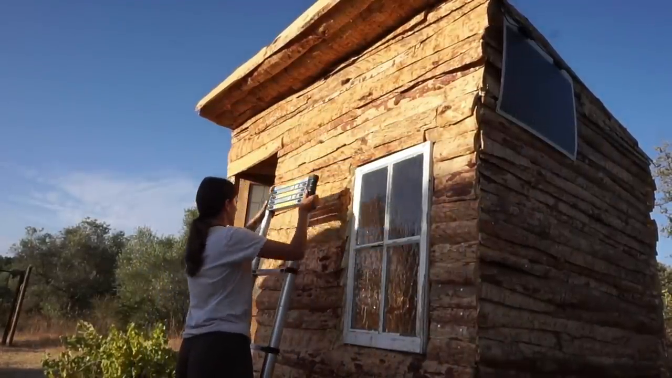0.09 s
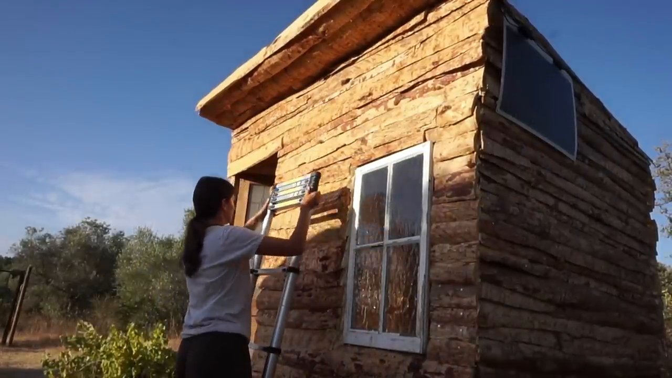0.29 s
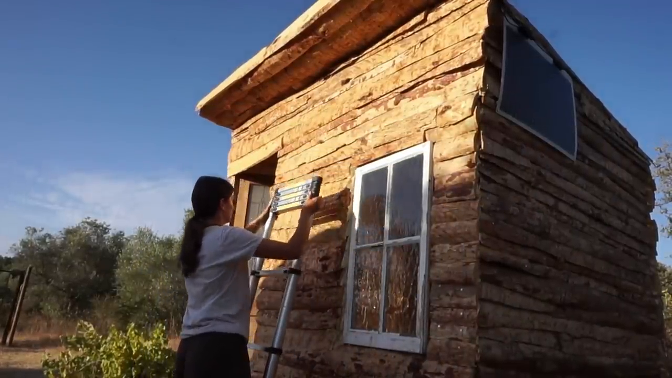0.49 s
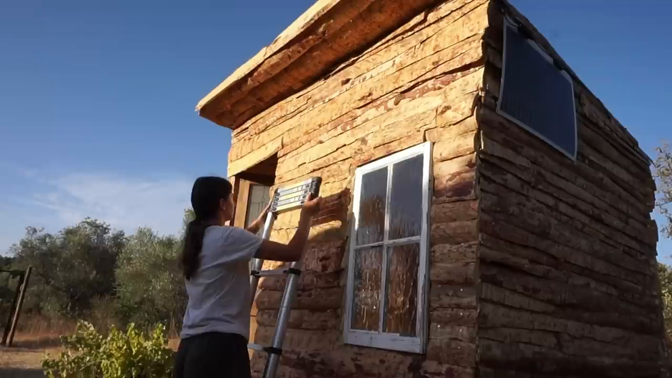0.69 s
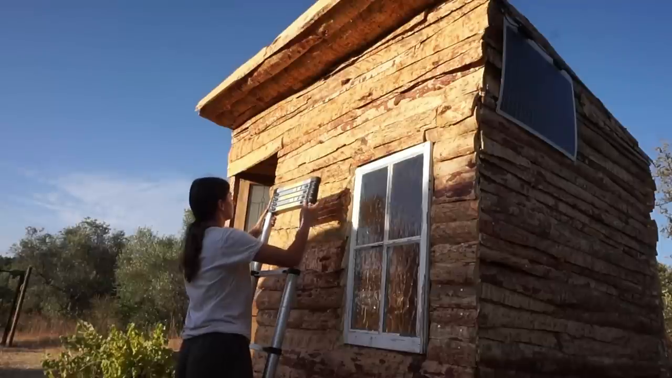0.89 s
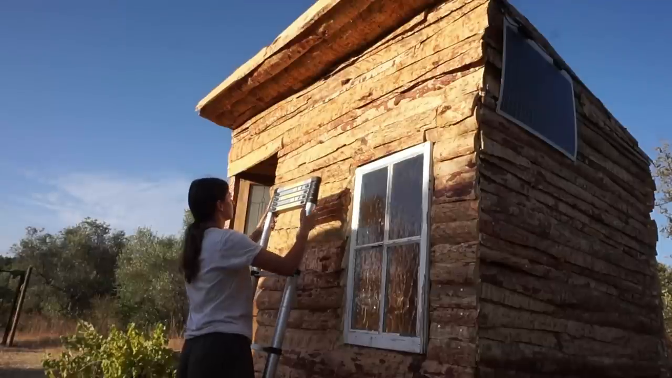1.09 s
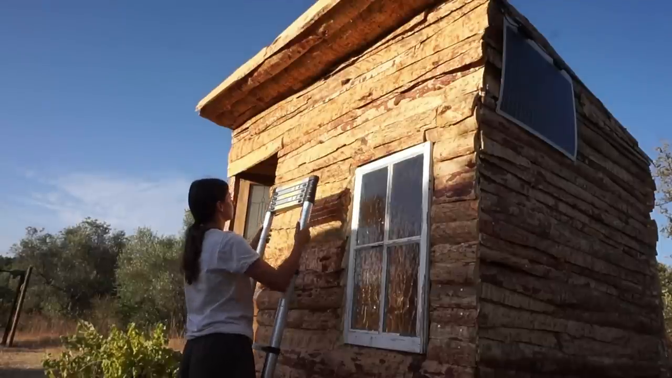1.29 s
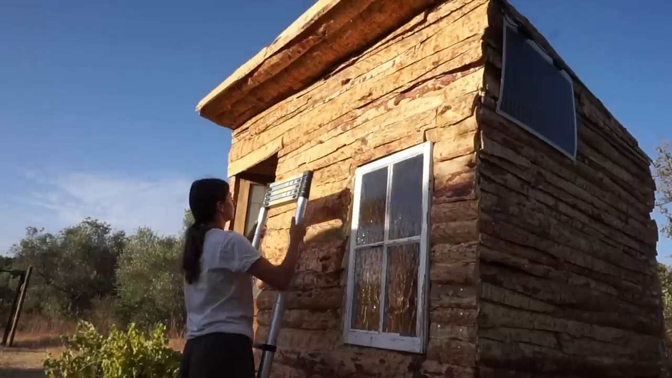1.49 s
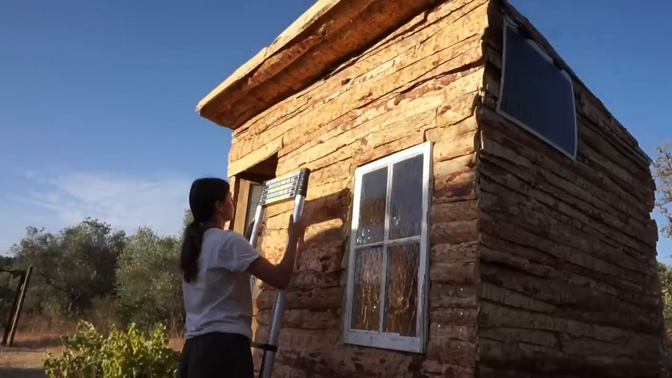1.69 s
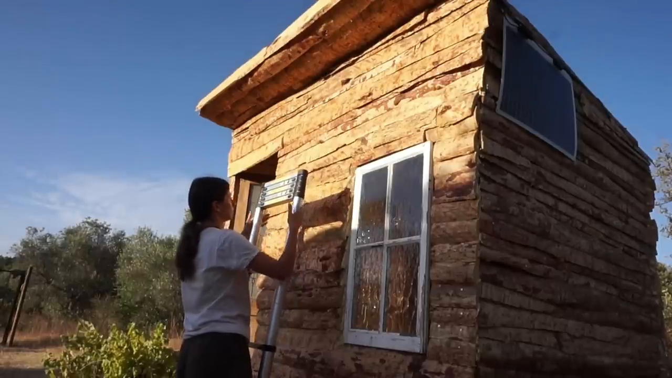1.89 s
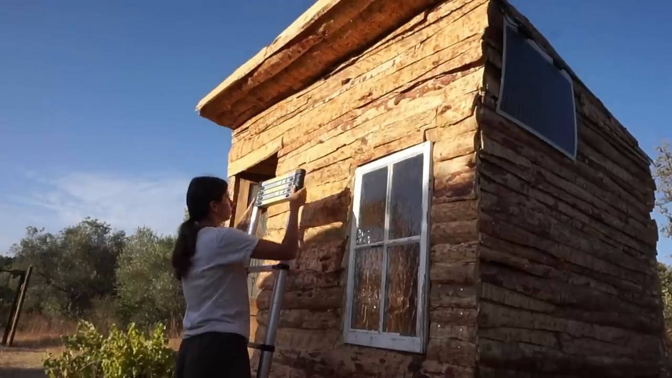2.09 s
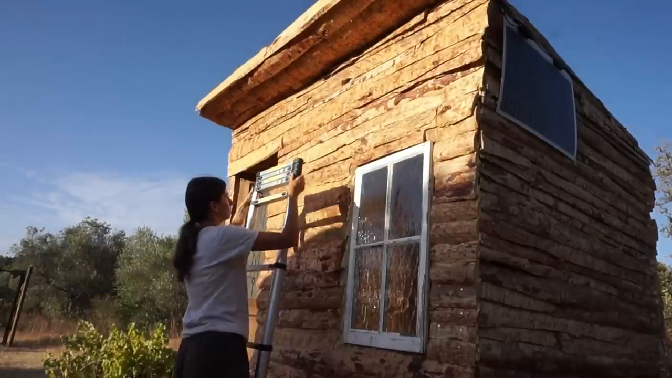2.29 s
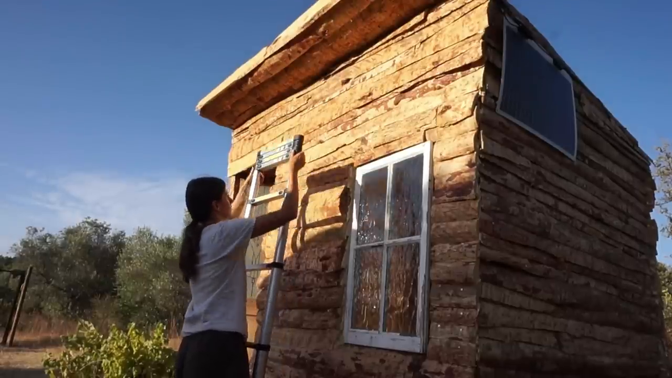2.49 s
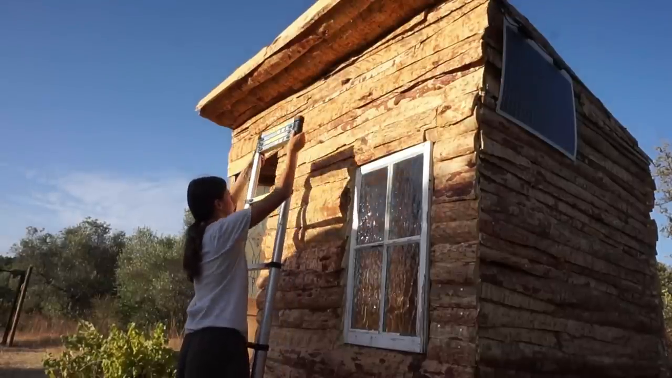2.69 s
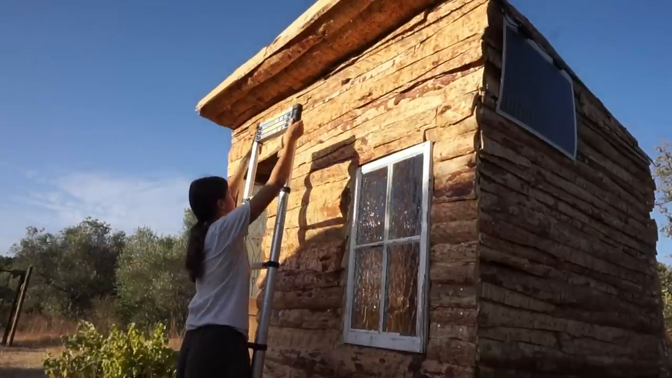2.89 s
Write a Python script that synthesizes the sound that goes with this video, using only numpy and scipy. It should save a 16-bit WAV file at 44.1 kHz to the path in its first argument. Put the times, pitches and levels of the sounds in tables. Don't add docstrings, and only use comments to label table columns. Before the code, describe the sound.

Aluminium telescopic ladder clacks and rattles against a timber wall outdoors, with light wind puffs

```python
import sys
import numpy as np
from scipy import signal
from scipy.fft import rfft, irfft, next_fast_len
from scipy.io import wavfile
from scipy.ndimage import uniform_filter1d, map_coordinates

SR = 44100
rng = np.random.default_rng(int(sys.argv[2]) if len(sys.argv) > 2 else 0)


def invert_db(level):
    return 10 ** (np.asarray(level, dtype=float) / 20)


def persist_wave(psi):
    counts = np.round(np.clip(psi, -1, 1) * 32767).astype(np.int16)
    wavfile.write(sys.argv[1], SR, np.atleast_2d(counts).T)


N = 127890
HIT = 8192


def unit(x):
    return x / np.sqrt(np.mean(x ** 2) + 1e-20)


def along(points, hz):
    f, v = np.transpose(points)
    return np.interp(np.log(hz + 1), np.log(f + 1), v)


def curve(rows):
    s, v = np.transpose(rows)
    return np.interp(np.arange(N) / SR, s, v)


def wobble(rate, size=N):
    knots = rng.standard_normal(int(size * rate / SR) + 4)
    return map_coordinates(knots, [np.arange(size) * rate / SR])


def filtered(x, response):
    m = next_fast_len(len(x) + 8192)
    return irfft(rfft(x, m) * response(np.fft.rfftfreq(m, 1 / SR)), m)[:len(x)]


def causal(db):
    c = irfft(np.log(invert_db(db) + 1e-6))
    c[1:len(c) // 2] *= 2
    c[len(c) // 2 + 1:] = 0
    return np.exp(rfft(c))


def resonate(f, peaks):
    total = 0
    for k, (centre, width, db) in enumerate(peaks):
        mode = 1j * f * width / (centre * centre - f * f + 1j * f * width)
        total = total + (-1) ** k * invert_db(db) * mode
    return total


def add(out, x, s):
    out[round(s * SR):][:len(x)] += x


def contact(length_s, rise_s, t60_s, grain_db, response):
    t = np.arange(HIT) / SR
    shape = (1 - np.exp(-t / rise_s)) * invert_db(-60 * np.maximum(t - length_s, 0) / t60_s)
    grain = invert_db(grain_db * wobble(903.3, size=HIT)) * rng.standard_normal(HIT)
    x = filtered(shape * grain, response)
    return x / np.sqrt(uniform_filter1d(x ** 2, size=132).max())


# t/s, peak level/dB
WIND_PUFFS = [(0.679, -45.5), (0.729, -40.5), (0.767, -49), (0.858, -46), (1.259, -44), (1.298, -53.5),
              (1.352, -36), (1.401, -47), (1.56, -37), (1.605, -42), (1.634, -40), (1.729, -35.5),
              (2.022, -37), (2.05, -36), (2.308, -47), (2.349, -43.5), (2.446, -36), (2.494, -35),
              (2.519, -38.5), (2.558, -41.5), (2.745, -37), (2.794, -49), (2.821, -40), (2.849, -31.5),
              (2.89, -39.5)]
# t/s, level/dB
GUST_LEVEL = [(.25, -76.5), (.32, -68), (.75, -54.5), (1.2, -64.5), (1.33, -44), (1.47, -60.5),
              (1.6, -49.5), (1.85, -60.5), (2.06, -51), (2.2, -65.5), (2.45, -48), (2.65, -66), (2.82, -40)]
# f/Hz, density/dB per Hz
BUFFET_SPECTRUM = [(20, -17.5), (45, 0.5), (90, -5.5), (150, -11.5), (250, -23.5), (500, -68.5)]
# f/Hz, density/dB per Hz
AIR_SPECTRUM = [(71, -28), (120, -0.5), (377, -5.5), (462, -5), (3490, -23.5), (14300, -27), (15800, -31)]


def wind():
    out = np.zeros(N + HIT)
    lead_s = .06
    t = np.arange(HIT) / SR - lead_s
    for s, db in WIND_PUFFS:
        hz = 89.1 * np.exp(rng.normal(0, 0.0946))
        swell = np.exp(-(t * hz / 0.49) ** 2)
        push = np.sin(2 * np.pi * hz * t + rng.normal(np.pi, 0.88))
        add(out, invert_db(db) * swell * push, s - lead_s)
    rumble = filtered(rng.standard_normal(N), lambda f: invert_db(along(BUFFET_SPECTRUM, f)))
    lumps = invert_db(4.27 * wobble(29.783)) * rumble
    spectrum = [(40, -52.5)] + list(AIR_SPECTRUM)
    air = filtered(rng.standard_normal(N), lambda f: invert_db(along(spectrum, f)))
    fade = np.minimum(np.arange(N)[::-1] / 200, 1)
    gusts = fade * (out[:N] + invert_db(curve(GUST_LEVEL)) * unit(lumps))
    return gusts + invert_db(-62 + 1.3 * wobble(3.91)) * unit(air)


# t/s, level/dB
RUB_LEVEL = [(0, -60.5), (.35, -60), (.55, -60), (.75, -73), (1.45, -92), (1.7, -65), (2.14, -64.5),
             (2.25, -74), (2.5, -56.5), (2.72, -57.5), (2.9, -70.5)]
# f/Hz, density/dB per Hz
RUB_SPECTRUM = [(120, -21), (250, -7.5), (500, -15.5), (1700, -17.5), (4500, -23.5), (15500, -34)]
# f/Hz, then a list of t/s, level/dB
SQUEAKS = [
    (1310, [(.1, -69), (.14, -90)]),
    (2380, [(.11, -70), (.15, -90)]),
    (1520, [(2.3, -90), (2.4, -73), (2.6, -72), (2.67, -64), (2.76, -80)]),
    (1600, [(2.72, -90), (2.79, -67)]),
]


def rubbing():
    level_db = curve(RUB_LEVEL)
    loudest_db = level_db.max()
    grain = unit(invert_db(wobble(120) + 1.1 * wobble(21.76)) * rng.standard_normal(N))
    broad = unit(filtered(grain, lambda f: invert_db(along(RUB_SPECTRUM, f))))
    notes = np.zeros(N)
    for hz, fits in SQUEAKS:
        tone = filtered(rng.standard_normal(N), lambda f: resonate(f, [(hz, 136, 0)]) ** 2)
        notes += invert_db(curve(fits) + 5.4 * wobble(44.71)) * unit(tone)
    return invert_db(-0.5 + loudest_db + 0.765 * (level_db - loudest_db)) * broad + notes


# t/s, level/dB, chatter length/s
SETTLE_KNOCKS = [
    (.006, -53, 0.0066),
    (0.178, -35.5, 0.0386),
    (.201, -21, 0.0064),
    (0.212, -25, 0.006),
    (0.226, -36.5, 0.0082),
    (0.238, -29, 0.0045),
    (0.252, -35, 0.00215),
]
SHIFT_KNOCKS = [(0.352, -51, 0.0128), (.370, -47.5, 0.0047), (0.379, -44, 0.00415), (0.401, -39, 0.0134),
                (0.409, -36.5, 0.0041), (0.429, -39.5, 0.0143), (.442, -42, 0.0178), (.457, -38, 0.0076),
                (.468, -50, 0.0057), (0.492, -49, 0.0036), (0.618, -42, 0.00276)]
REGRIP_KNOCKS = [(1.508, -61, 0.0045), (1.533, -43, 0.00906), (1.559, -45.5, 0.0077),
                 (1.568, -41.5, 0.0089), (1.587, -36, 0.00186), (1.595, -36, 0.0044), (1.605, -45, 0.0065),
                 (1.619, -53.5, 0.0023), (1.814, -42, 0.0167), (1.828, -35, 0.0164), (1.844, -32, 0.00126),
                 (1.854, -38, 0.0061), (1.861, -31, 0.0052), (1.872, -33, 0.0081), (1.888, -43, 0.0054)]
LOCK_KNOCKS = [(2.242, -51.5, 0.0051), (2.290, -52.5, 0.0028), (2.425, -40, 0.0058), (2.433, -45.5, 0.0031),
               (2.549, -45, 0.0075), (2.558, -33, 0.0055), (2.565, -32, 0.00743), (2.578, -41, 0.0124),
               (2.588, -36, 0.0257), (2.601, -22.5, 0.00481), (2.609, -36.5, 0.00404), (2.622, -50, 0.0062),
               (2.638, -52.5, 0.022), (2.655, -45.5, 0.0158)]
# f/Hz, level/dB
TUBE_MODES = [
    [(700, 1), (1757.6, 6.5), (2453, 1), (3240, 4.5), (1130, -5.5), (4280, -5)],
    [(350, -6.5), (845, 5), (1400, 1), (1890, 2.5), (2750, -4)],
    [(509, -3.5), (1017, 3), (1750, -1.5), (2550, 2.5), (3280, -5.5)],
    [(680, -0.5), (1280, 3), (1848, -1.5), (2497, 2.5), (3300, -5.5)],
]
GRIP_TILT = [-0.13, -0.018, -1.86, -1.474]
# f/Hz, density/dB per Hz
COLLAR_SPECTRUM = [(88, -49.5), (150, -11.5), (695, -9.5), (1900, -5.5), (5000, -6.5), (10000, -16.5),
                   (15800, -24.5)]


def tubes():
    out = np.zeros(N + HIT)
    grips = (SETTLE_KNOCKS, SHIFT_KNOCKS, REGRIP_KNOCKS, LOCK_KNOCKS)
    ring_db, mode_width_hz, t60_s = 3.5, 200, 0.0511
    soft_dark = 0.0812
    for knocks, modes, tilt in zip(grips, TUBE_MODES, GRIP_TILT):
        for s, db, length_s in knocks:
            peaks = [(hz * np.exp(rng.normal(0, .02)), mode_width_hz, g + ring_db + rng.normal(0, 2))
                     for hz, g in modes]

            def body(f):
                octaves = np.log2(np.clip(f, 200, 12000) / 1500)
                tilted = causal((tilt + soft_dark * (db + 22.5)) * octaves)
                metal = causal(along(COLLAR_SPECTRUM, f)) + resonate(f, peaks)
                return tilted * metal * (1j * f / (190 + 1j * f)) ** 2

            add(out, invert_db(db) * contact(length_s, 0.12 * length_s, t60_s, 3.15, body), s)
    return out[:N]


# t/s, f/Hz, level/dB, t60/s
RINGING_RUNGS = [
    (.21, 2288, -34, 0.21),
    (0.255, 2462, -42.5, 0.12),
    (1.615, 2490, -49, 0.123),
    (1.866, 2390, -51, 0.256),
    (2.645, 4373, -44, 0.099),
]
# t/s, f/Hz, level/dB, t60/s
LIGHT_TAPS = [
    (.042, 1330, -48, .03),
    (.074, 1320, -45, .03),
    (.619, 330, -37, .025),
    (.626, 600, -40, .025),
    (1.963, 850, -42, .03),
    (2.214, 850, -49, .03),
    (2.409, 800, -48, .025),
]


def rungs():
    out, t = np.zeros(N + HIT), np.arange(HIT) / SR
    for s, hz, db, t60 in RINGING_RUNGS + LIGHT_TAPS:
        unsteady_db = 6.8 * np.minimum(t / 0.03, 1) * wobble(139, size=HIT)
        envelope = invert_db(db - 60 * t / t60 + unsteady_db) * (1 - np.exp(-t / 0.00053))
        add(out, envelope * np.sin(2 * np.pi * hz * t), s)
    return out[:N]


# t/s, level/dB, strongest ring f/Hz
PIN_TICKS = [(.201, -21.5, 6334), (0.212, -24.5, 5984), (0.219, -37, 8690), (0.229, -38, 6860),
             (0.242, -39, 6270), (0.400, -45, 6230), (.412, -49.5, 5580), (0.428, -41, 6910),
             (.446, -39, 6980), (0.452, -49, 6720), (1.532, -51, 9670), (1.556, -49.5, 5680),
             (1.561, -39.5, 7060), (1.588, -36.5, 6230), (1.828, -56.5, 9480), (1.841, -46.5, 6300),
             (1.854, -41.5, 6930), (1.869, -38.5, 7620), (1.873, -37.5, 8780), (1.888, -52, 9800),
             (2.422, -51.5, 8770), (2.43, -44.5, 8500), (2.476, -53.5, 6520), (2.549, -47, 5840),
             (2.562, -48, 9500), (2.586, -57.5, 6920), (2.601, -38.5, 7316)]
# f/Hz, level/dB
PIN_MODES = [(6260, 4.5), (6820, -8), (8560, -2.5), (9800, -2.5), (11200, -28)]
# f/Hz, density/dB per Hz
SNAP_SPECTRUM = [(150, -47), (2000, -6.5), (4000, 4.5), (6000, -8.5), (11000, -2), (14500, -16),
                 (15800, -26.5)]


def pins():
    out = np.zeros(N + HIT)
    chatter_s, rise_s, t60_s = 0.002, 0.00024, 0.0501
    for s, db, ring_hz in PIN_TICKS:
        peaks = [(hz, 220, g - 1.5 + rng.normal(0, 4)) for hz, g in PIN_MODES]
        peaks.append((ring_hz, 297, 17))

        def body(f):
            return causal(along(SNAP_SPECTRUM, f)) * (invert_db(-2.0) + resonate(f, peaks))

        add(out, invert_db(db) * contact(chatter_s, rise_s, t60_s, 3, body), s)
    return out[:N]


# t/s, peak level/dB, f/Hz, t60/s
LOW_BLOWS = [(.2045, -17.5, 417.7, 0.0273), (.2155, -26, 302, 0.029), (1.8134, -33, 549, 0.059),
             (.380, -35.5, 640, 0.028), (.4125, -26, 1151, 0.019), (.457, -27.5, 874, 0.023),
             (.470, -39, 760, 0.025), (.492, -40, 350, 0.031), (1.537, -37.5, 607.3, 0.038),
             (1.596, -24, 995, 0.0144), (1.5965, -31.5, 516.6, 0.033), (1.826, -27.5, 524, 0.047),
             (1.832, -26.5, 598, 0.027), (1.844, -37, 463, 0.0275), (1.862, -25, 1030, 0.015),
             (1.865, -25, 791, 0.017), (1.877, -24.5, 371, 0.0358), (1.883, -28.5, 524, 0.039),
             (2.559, -31.5, 737, 0.0365), (2.568, -33, 700, 0.044), (2.6005, -13.5, 769, 0.0286),
             (2.606, -16.5, 671, 0.032), (2.612, -20.5, 621.8, 0.0335)]
# t/s, peak level/dB, f/Hz, t60/s
HIGH_BLOWS = [(0.2013, -17, 3204, 0.035), (0.2037, -8.5, 1723, 0.0283), (0.2066, -24.5, 3240, 0.0165),
              (0.2116, -13, 2395, 0.021), (0.2167, -15.5, 1850, 0.0206), (.244, -20.5, 1572, 0.0212),
              (0.619, -39.5, 1604, 0.036), (.370, -34.5, 2200, .012), (.379, -32, 2403, .014),
              (.402, -34.5, 1905, 0.0234), (0.4414, -31, 2636, 0.026), (0.4465, -31, 3236, .025),
              (.453, -28.5, 2593, 0.021), (0.4588, -32, 1417, .018), (1.511, -51.5, 1756, 0.0435),
              (1.536, -34, 1740, 0.0315), (1.5874, -31.5, 3240, 0.0243), (1.5955, -25.5, 2620, 0.0176),
              (1.6208, -36.5, 2445, 0.0285), (1.8443, -19.5, 1590, 0.0123), (1.859, -25.5, 2605, 0.027),
              (1.8625, -23.5, 1890, 0.0116), (2.563, -32, 3320, 0.029), (2.569, -25.5, 1397, 0.025),
              (2.603, -9.5, 2609, 0.0143), (2.6035, -14.5, 1843, 0.028), (2.609, -22.5, 1206, 0.0364)]


def blows():
    out, t = np.zeros(N + HIT), np.arange(HIT // 2) / SR
    for s, db, hz, t60 in LOW_BLOWS + HIGH_BLOWS:
        envelope = invert_db(-60 * t / t60) * (1 - np.exp(-t / .0004))
        ring = envelope * np.sin(2 * np.pi * hz * t + rng.uniform(0, 2 * np.pi))
        crack = invert_db(-5.5 - 60 * t / 0.0039) * uniform_filter1d(rng.standard_normal(len(t)), size=5)
        add(out, invert_db(db - 4) * (ring + crack), s)
    return filtered(out[:N], lambda f: (1j * f / (170 + 1j * f)) ** 2)


# f/Hz, t60/s
WALL_DECAY = [(300, 0.3295), (2000, 0.169), (10000, 0.18)]


def wall(x):
    delay = round(.012 * SR)
    hz, t, z = signal.stft(rng.standard_normal(SR // 2), SR, nperseg=256)
    decay = invert_db(-60 * t / along(WALL_DECAY, hz)[:, None])
    tail = signal.istft(z * decay, SR, nperseg=256)[1]
    return signal.fftconvolve(np.pad(x, (delay, 0)), tail / np.linalg.norm(tail))[:N]


def scene():
    ladder = tubes() + rungs() + pins() + blows()
    echo = invert_db(-16) * wall(ladder)
    return (wind() + rubbing() + ladder + echo)[None]


def band_limit(x):
    return signal.sosfilt(signal.butter(12, 16450, fs=SR, output="sos"), x)


def record(dry):
    mix = filtered(dry[0], lambda f: f < 15830)[None]
    return band_limit(mix)


dry = scene()
out = record(dry)
persist_wave(out)
```